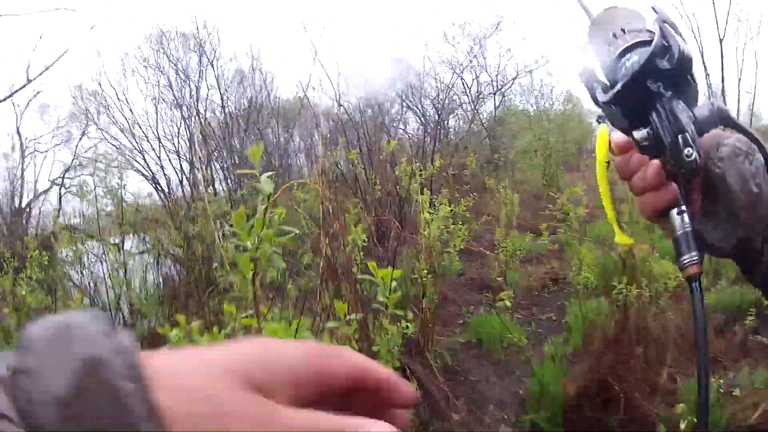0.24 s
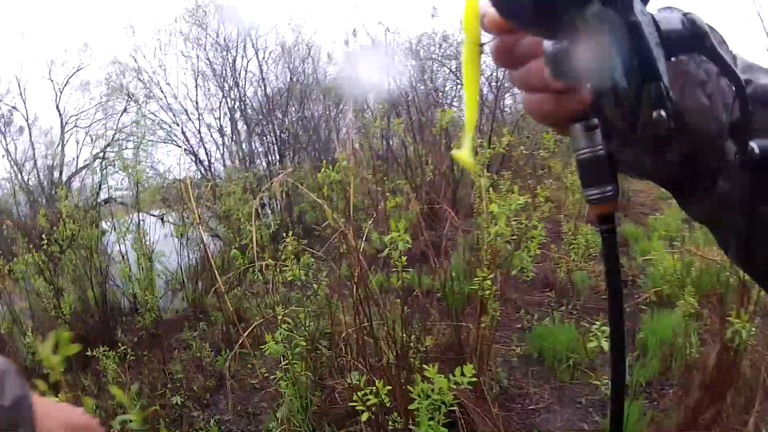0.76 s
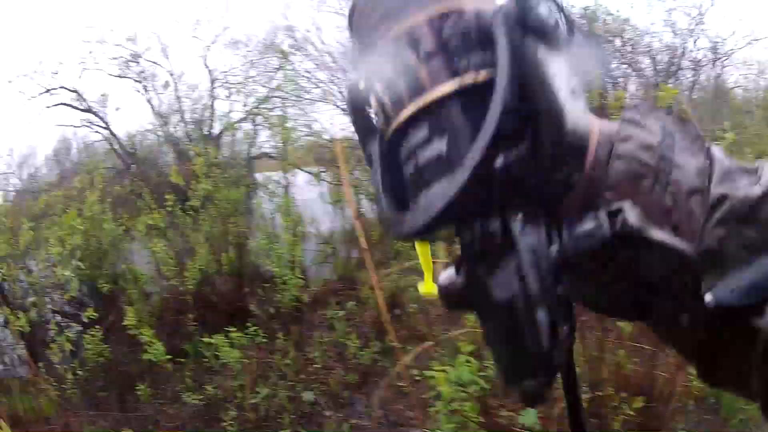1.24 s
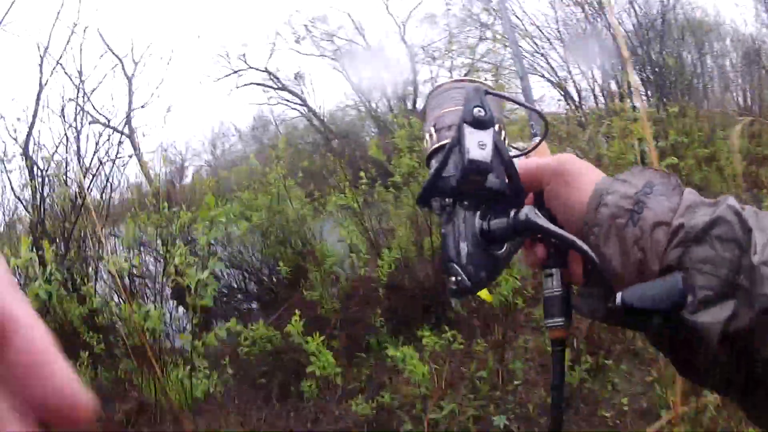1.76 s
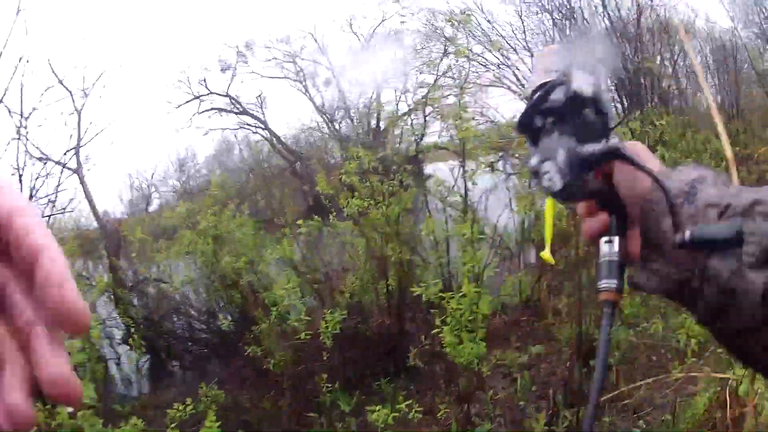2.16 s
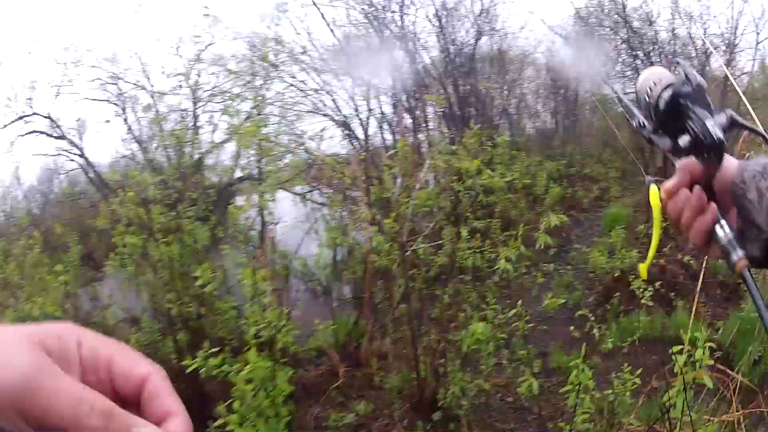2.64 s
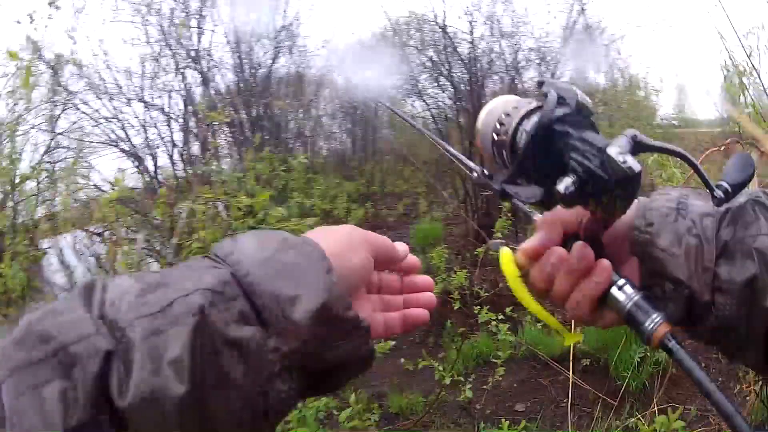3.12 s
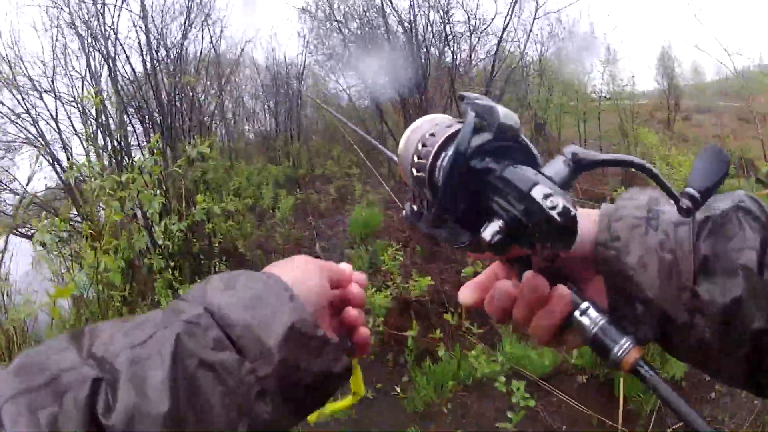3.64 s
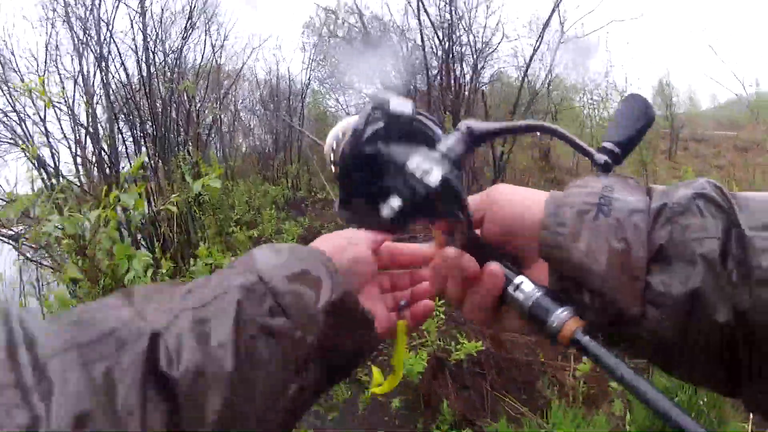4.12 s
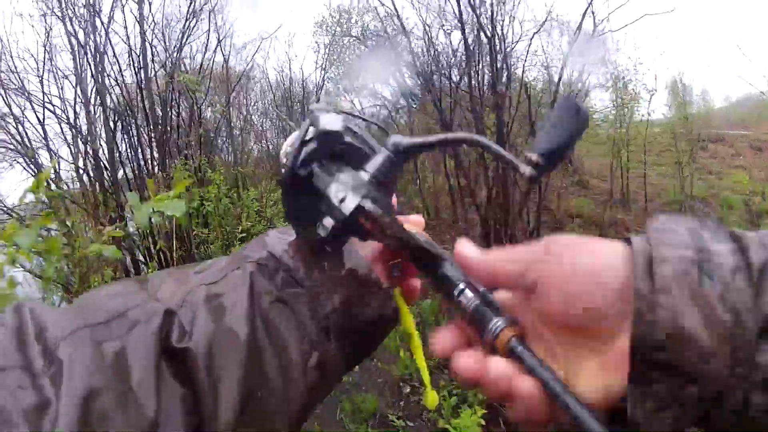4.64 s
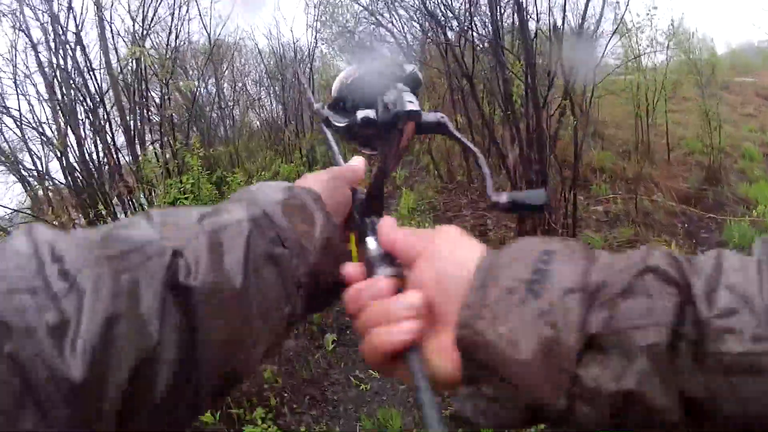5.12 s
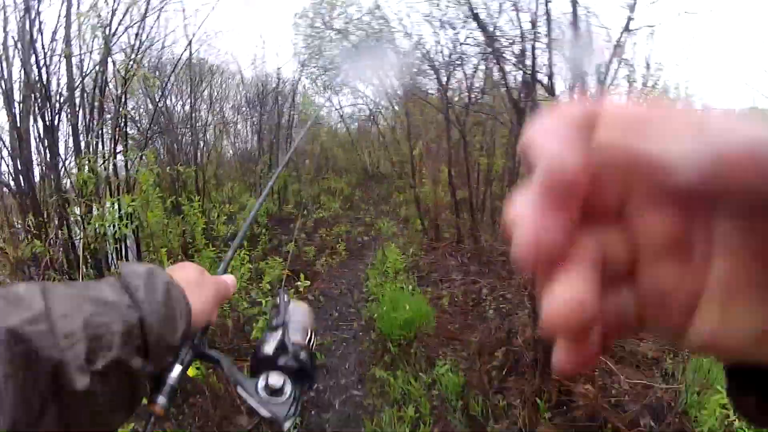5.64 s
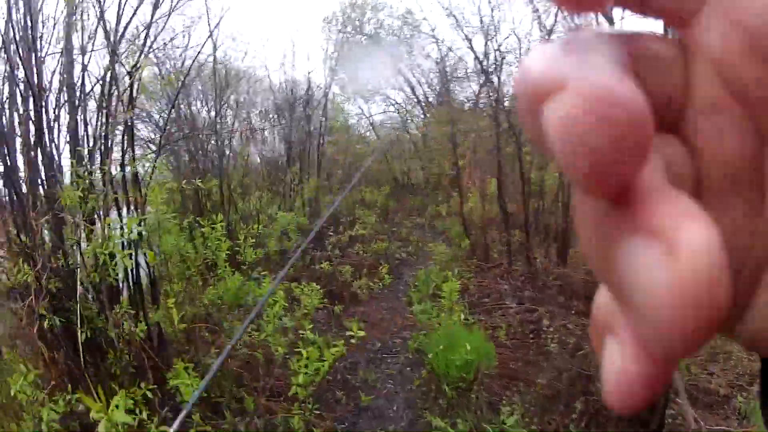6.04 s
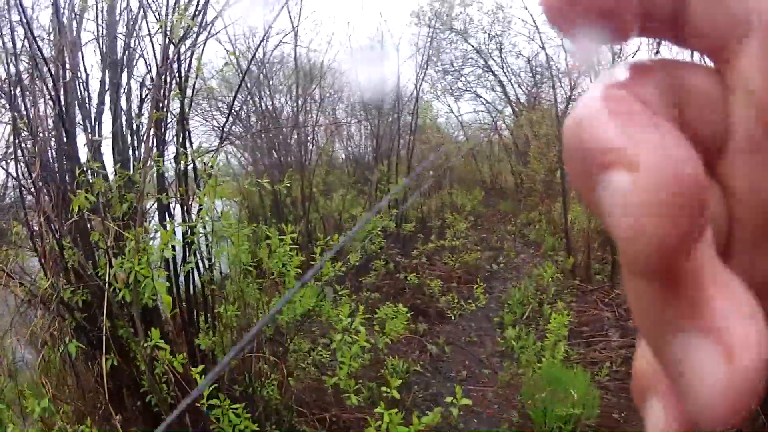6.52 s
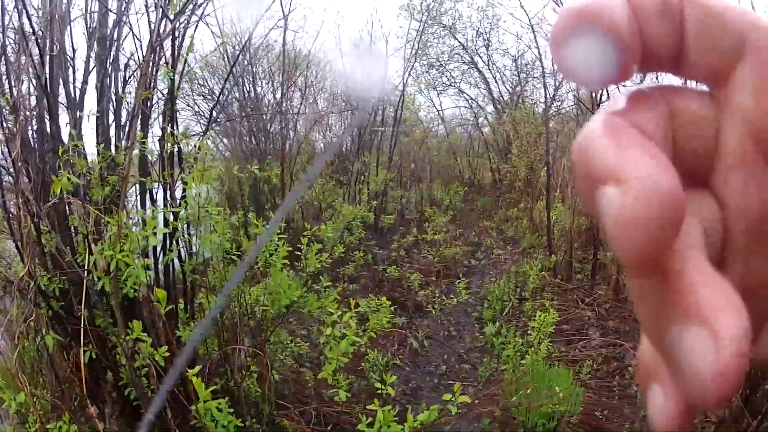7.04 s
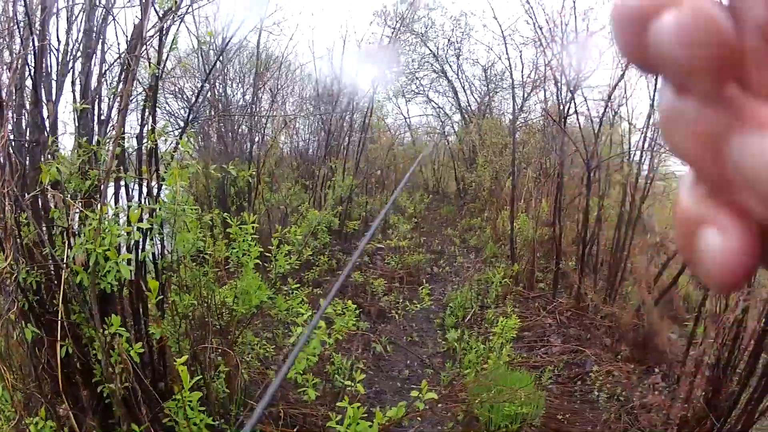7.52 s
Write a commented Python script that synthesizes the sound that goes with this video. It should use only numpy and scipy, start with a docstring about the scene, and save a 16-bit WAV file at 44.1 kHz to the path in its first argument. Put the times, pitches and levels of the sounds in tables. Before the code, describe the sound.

Close, dry handling and brushing sounds of a walk through wet undergrowth, picked up inside a small camera case. A muffled jacket rub and low boot rumble continue throughout, with grainy stem swish and faint wet leaf fizz. From 0.3 to 0.5 s a low thump and a cluster of twig clicks arrive. At about 1.0 s comes the loudest event, a hard hollow double knock with a thump and snaps. Rustle swells around 1.9 s, then settles; a sharp snap clicks at 2.9. Rubbing rises near 3.1, knocks follow at 3.7 to 3.9, and the strongest swish comes about 4.15, with bright cracks at 4.05 and 4.6. Bumps and clicks continue at 5.2 and 5.6 to 5.8 amid another rustle. Short brushes pass at 6.1 to 6.5. It fades quietest near 7.2, then small knocks and a renewed rub close at 7.6 to 7.8. Treble is gritty.

```python
"""Walk through wet undergrowth, body-worn camera

Boots rumble, a rain jacket rubs the case, stems swish and wet leaves fizz: coloured noise on shared slips.
Twigs snap as damped sines, case modes and splinter noise; stems knock and thump the case as short swings.
Leaves drag past as swells of ragged resonant noise. The camera holds slow samples: treble mirrors the sound.
"""
import sys
import numpy as np
from scipy import signal
from scipy.fft import rfft, irfft, next_fast_len
from scipy.io import wavfile
from scipy.ndimage import uniform_filter1d, map_coordinates

SR = 44100
rng = np.random.default_rng(int(sys.argv[2]) if len(sys.argv) > 2 else 0)


def log_audio(samples):
    """Write samples as a 16-bit WAV file to the path given in sys.argv[1]."""
    # one column per channel
    frames = np.atleast_2d(samples).T
    # limit to full scale, then quantise
    limited = np.clip(frames, -1, 1)
    pcm = np.round(limited * 32767).astype(np.int16)
    wavfile.write(sys.argv[1], SR, pcm)


N = 343098

# heavier stems and footfalls thump the whole camera: (time [s], peak [dB], pitch [Hz])
THUMPS = [(0.3532, -24.5, 76), (0.9682, -32, 245), (1.045, -15, 250), (1.0852, -28.5, 59),
          (1.4508, -28, 161), (3.4292, -28, 129), (3.885, -19, 96), (4.3705, -23, 223), (4.753, -22.5, 161),
          (5.0742, -28.5, 75), (5.1502, -35, 247), (5.1804, -19, 186), (5.7846, -22, 237),
          (7.618, -34, 120), (7.6942, -33, 247), (7.7124, -26, 78), (7.7262, -25, 41)]
# stems knock the case: (time [s], peak [dB], pitch [Hz])
KNOCKS = [(0.3182, -32, 511), (0.3533, -23, 314), (0.9692, -30, 304), (1.0204, -5, 540), (1.046, -11, 530),
          (1.0852, -31, 592), (1.3057, -25.5, 402), (1.4505, -22, 355), (1.5961, -30.5, 585),
          (1.6749, -29, 610), (1.7006, -22, 470), (2.125, -28.5, 590), (2.4393, -31, 455),
          (2.7672, -22.5, 483), (2.8862, -24, 320), (3.4292, -29, 603), (3.4605, -22, 340),
          (3.7349, -16, 397), (3.885, -32, 312), (3.9156, -19, 600), (3.9982, -35, 560),
          (4.1002, -27.5, 550), (4.3702, -25, 462), (4.7531, -23, 533), (5.15, -26.5, 345),
          (5.1803, -18, 377), (5.4292, -23.5, 300), (5.5228, -26, 320), (5.568, -17, 536),
          (5.6443, -25, 580), (5.7851, -26, 600), (6.411, -31, 506), (6.4524, -21, 567),
          (6.7622, -36.5, 533), (7.0002, -37.5, 303), (7.049, -31, 595), (7.2712, -31, 550),
          (7.5637, -31.5, 408), (7.6178, -28.5, 358), (7.6329, -29, 334), (7.6942, -29.5, 581),
          (7.7265, -26.5, 590)]
# air in the case: (pitch [Hz], t60 [s])
CAVITY = (633, 0.022)
# low modes of the case: (pitch [Hz], relative level [dB], t60 [s])
BODY_MODES = [(940, 4, 0.018), (1255, -1.5, 0.023), (1660, -4.5, 0.013)]
# high modes of the case: (pitch [Hz], relative level [dB], t60 [s])
CASE_MODES = [(2096, -1.5, .014), (2540, -2.5, 0.0071), (2910, -2.5, 0.015)]
# twig snaps: (time [s], crack level [dB], crack pitch [Hz], body level [dB], splinter noise drive [dB])
TWIGS = [(0.262, -30, 2900, -40.5, -27), (0.3168, -44.5, 1900, -38, -38), (0.354, -20, 2270, -28, -37),
         (0.383, -38, 1960, -43, -32), (0.421, -41, 2020, -41, -26.5), (0.4459, -32.5, 1800, -42, -30),
         (0.4612, -26, 1780, -32.5, -17), (0.566, -43, 2200, -46, -56), (1.0213, -20.5, 2070, -30, -19.5),
         (1.0465, -16, 2730, -44, -45), (1.0858, -30, 2350, -38, -40), (1.3067, -34, 1950, -33, -33),
         (1.4698, -56, 2350, -55, -31.5), (1.597, -40, 2030, -55, -28.5), (1.9903, -35.5, 2660, -44, -41),
         (2.2617, -35.5, 1930, -44, -33), (2.379, -39.5, 2030, -47, -54), (2.7951, -31.5, 3270, -50, -27),
         (2.8862, -17.5, 1590, -32, -41), (2.9872, -31, 1850, -49, -22), (3.4284, -61, 2200, -39, -49),
         (3.7348, -46, 2100, -64, -26), (3.885, -24, 2300, -37, -54), (3.8939, -19, 2230, -23, -16),
         (3.9158, -24, 2200, -34, -44), (3.9675, -43.5, 2040, -38, -38), (3.999, -33.5, 3080, -51, -43),
         (4.05, -15, 3200, -40, -7.5), (4.061, -30.5, 1920, -49, -18), (4.147, -38.5, 2230, -31, -30),
         (4.4295, -37.5, 2700, -57, -51), (4.5815, -17, 2130, -27, -9), (4.6577, -43, 2770, -56, -33),
         (4.6898, -38, 2150, -36, -31), (4.7547, -48, 2010, -42, -36), (4.7698, -47, 2630, -35, -51),
         (4.8386, -33, 2830, -56, -53), (4.879, -35, 2440, -51, -41), (4.9185, -39, 2880, -54, -36),
         (5.18, -42, 2230, -40.5, -19), (5.25, -37, 2800, -44, -46), (5.2628, -36, 2000, -49, -52),
         (5.45, -40, 2230, -46, -27.5), (5.5331, -39, 2520, -33.5, -43), (5.567, -29.5, 1990, -39, -26),
         (5.6446, -36, 3040, -36, -33), (5.7256, -20, 3030, -37, -31), (5.7847, -50, 2000, -41, -50),
         (5.96, -40.5, 1990, -47, -52), (6.1173, -31, 1740, -38, -38), (6.1318, -34.5, 1930, -42, -38),
         (6.4521, -36, 1570, -31.5, -49), (6.46, -31.5, 2900, -57, -44), (6.5854, -43, 2080, -40, -30),
         (6.761, -29.5, 2020, -59, -49), (7.002, -43, 2080, -46.5, -55), (7.0417, -46, 2220, -45.5, -56),
         (7.294, -48, 2740, -49.5, -35), (7.4465, -39.5, 2040, -50, -46), (7.5644, -37.5, 2030, -34.5, -49)]
# short ragged leaf sweeps: (time [s], length [s], level [dB], centre [Hz], width [Hz])
SWEEPS = [(0.438, 0.039, -43, 2020, 1800), (2.765, 0.033, -51, 1460, 1500),
          (6.112, 0.071, -50.5, 1860, 2200), (6.266, 0.036, -45, 2630, 1800),
          (6.299, 0.034, -47, 1490, 1610), (6.868, 0.023, -56.5, 2400, 700), (6.914, 0.015, -49, 2370, 600),
          (6.947, 0.019, -54, 2320, 900), (7.527, 0.13, -55.5, 2180, 2010)]
# level curves of the walk: (time [s], jacket rub [dB], stem swish [dB])
STRIDE = [(0.0, -48, -56.5), (0.28, -47, -54), (0.43, -41, -51.5), (0.82, -43, -53.5), (1.13, -43, -49),
          (1.5, -46, -55), (1.67, -47.5, -47.5), (1.85, -39.5, -43.5), (1.99, -38.5, -44.5),
          (2.25, -44.5, -56), (2.49, -47, -56.5), (3.14, -39, -47), (3.55, -44.5, -54.5),
          (4.15, -34.5, -39.5), (4.36, -40, -45.5), (4.46, -46.5, -55.5), (5.59, -38.5, -44.5),
          (5.95, -46, -54), (6.14, -39, -53.5), (6.2, -48.5, -53.5), (6.32, -37.5, -49.5), (6.39, -46, -56),
          (6.46, -41, -46), (6.69, -50, -58), (7.2, -56, -64), (7.78, -42.5, -50)]
# boot rumble colour: (frequency [Hz], relative density [dB])
RUMBLE_COLOUR = [(8.8, -37), (15, -22), (54, 6.5), (220, -0.5), (290, -28), (480, -120)]
# jacket rub colour: (frequency [Hz], relative density [dB])
RUB_COLOUR = [(71, -6), (120, -5), (594, -2), (748, -6), (848, -17), (1200, -17), (1560, -25), (2640, -120)]
# stem swish colour: (frequency [Hz], relative density [dB])
SWISH_COLOUR = [(470, -2), (800, -2.5), (1060, -11), (1770, -11.5), (2200, -9), (3600, -16), (4680, -22.5),
                (7920, -120)]
# wet fizz colour: (frequency [Hz], relative density [dB])
FIZZ_COLOUR = [(1760, -55), (3000, -3.5), (4220, -10), (4840, -6.5), (6000, -10), (7800, -49),
               (13200, -120)]

RUMBLE_UNDER_RUB_DB, RUMBLE_SWING_RATIO = 9, 1.0
FIZZ_UNDER_SWISH_DB, FIZZ_SWING_RATIO = 12.5, 0.54
SPLINTER_PITCH_RATIO = 1.66  # over the crack
HOLD_HZ, DULL_HZ, TOP_HZ = 12000, 15300, 16494  # sampling rate, treble step, upper cutoff


def amp(db):
    """Gain of a level in dB."""
    return 10 ** (np.asarray(db) / 20)


def unit(x):
    """x at rms 1."""
    return x / np.sqrt(np.mean(x ** 2) + 1e-20)


def along(points, hz):
    """Interpolate (Hz, value) points on a log frequency axis."""
    f, v = np.transpose(points)
    return np.interp(np.log(hz + 1), np.log(f + 1), v)


def curves(rows):
    """One per-sample curve for each column after the time."""
    times_s, *columns = np.transpose(rows)
    return [np.interp(np.arange(N) / SR, times_s, column) for column in columns]


def follows(lead_db, under_db, swing_ratio):
    """A level that lies under another and swings with it."""
    mean_db = lead_db.mean()
    return mean_db - under_db + swing_ratio * (lead_db - mean_db)


def wobble(knots_per_s):
    """Smooth random curve through normal knots."""
    knots = rng.standard_normal(int(N * knots_per_s / SR) + 4)
    return map_coordinates(knots, [np.arange(N) * knots_per_s / SR])


def filtered(x, response):
    """x times a response of frequency, zero-padded FFT."""
    m = next_fast_len(N + SR // 2)
    return irfft(rfft(x, m) * response(np.fft.rfftfreq(m, 1 / SR)), m)[..., :N]


def add_at(out, time_s, sound):
    """Add a sound into out at a time."""
    out[round(time_s * SR):][:len(sound)] += sound


def ring(t, hz, t60_s, attack_s):
    """Damped sine that starts with a pull, peak near 1."""
    decay = amp(-60 * t / t60_s)
    return -np.sin(2 * np.pi * hz * t) * decay * (1 - np.exp(-t / attack_s))


def modes(t, table):
    """Neighbouring modes swing in opposite sense, at new strengths for every blow."""
    shake_db = rng.normal(0, 3.15, len(table))
    total = np.zeros(len(t))
    for k, (hz, db, t60_s) in enumerate(table):
        total += (-1) ** k * amp(db + shake_db[k]) * ring(t, hz, t60_s, 0.00011)
    return total


def thumps():
    """A slow swing falls 60 dB within 4.8 cycles."""
    out, t = np.zeros(N + SR), np.arange(SR // 8) / SR
    for time_s, db, hz in THUMPS:
        add_at(out, time_s, amp(db) * ring(t, hz, 4.8 / hz, 0.0017))
    return out[:N]


def knocks():
    """A stem gives the case one pull and push; the air in the case rings."""
    out, t = np.zeros(N + SR), np.arange(SR // 8) / SR
    for time_s, db, hz in KNOCKS:
        window = np.sin(np.pi * np.minimum(hz * t, 1)) ** 0.22 * (hz * t < 1)
        one_swing = -np.sin(2 * np.pi * hz * t) * window
        air = amp(rng.normal(-4.5, 2.8)) * ring(t, *CAVITY, 0.0013)
        add_at(out, time_s, amp(db) * (one_swing + air))
    return out[:N]


def twigs():
    """Each twig cracks at its own pitch, shakes the case's modes and throws a burst of bright splinters."""
    out, t = np.zeros(N + SR), np.arange(SR // 32) / SR
    for time_s, crack_db, crack_hz, body_db, splinter_db in TWIGS:
        crack = ring(t, crack_hz, 0.012, 0.00027) + 0.51 * modes(t, CASE_MODES)
        body = modes(t, BODY_MODES)
        band = signal.iirpeak(SPLINTER_PITCH_RATIO * crack_hz, 2.4, SR)
        burst = amp(-60 * t / 0.014) * rng.standard_normal(len(t))
        splinters = signal.lfilter(*band, signal.lfilter(*band, burst))
        snap = amp(crack_db) * crack + amp(body_db) * body + amp(splinter_db) * splinters
        add_at(out, time_s, snap)
    return out[:N]


def sweeps():
    """A bunch of leaves drags past: a quick swell of ragged noise in one broad resonance."""
    out = np.zeros(N + SR)
    for time_s, length_s, db, centre_hz, width_hz in SWEEPS:
        swell = np.sin(np.pi * np.linspace(0, 1, round(length_s * SR))) ** 0.18
        steps = np.repeat(rng.standard_normal(SR // 100), 128)[:SR // 6]  # new strength every 128 samples
        ragged = amp(5.0 * steps) * rng.standard_normal(SR // 6)
        band = signal.iirpeak(centre_hz, centre_hz / width_hz, SR)
        noise = signal.lfilter(*band, signal.lfilter(*band, ragged))
        add_at(out, time_s, amp(db) * swell * unit(noise)[:len(swell)])
    return out[:N]


def crackle(per_s, spread_db, t60_s, busy):
    """Envelope of sudden small slips that die away, denser when busy, a few much larger."""
    chance, size = rng.random(N), rng.exponential(size=N)
    slips = (chance < busy * per_s / SR) * amp(spread_db * np.minimum(size, 3))
    return unit(signal.lfilter([1], [1, -amp(-60 / (t60_s * SR))], slips))


def grains(per_s, centre_hz, octaves, cycles, spread_db, busy):
    """Tiny ticks, each a few cycles at its own pitch, denser when busy, a few much larger."""
    starts = np.flatnonzero(rng.random(N) < busy * per_s / SR)
    draw, t = rng.standard_normal((len(starts), 2)), np.arange(400) / SR
    hz = np.clip(centre_hz * 2 ** (octaves * draw[:, :1]), 60, 5600)
    size = amp(spread_db * np.minimum(np.abs(draw[:, 1:]), 2.5))
    ticks = size * ring(t, hz, cycles / hz, 0.28 / hz)
    places = starts[:, None] + np.arange(400)
    return unit(np.bincount(places.ravel(), ticks.ravel(), N + 400)[:N])


def patchy(patchy_db):
    """White noise whose colour drifts in patches a few hundred Hz high and some 60 ms long."""
    z = signal.stft(rng.standard_normal(N), nperseg=512)[2]
    field = uniform_filter1d(rng.standard_normal(z.shape), size=5, axis=0)  # over frequency
    field = uniform_filter1d(field, size=10, axis=1)  # over time
    return signal.istft(z * amp(patchy_db * unit(field)), nperseg=512)[1][:N]


def friction(colour, level_db, slips, grain_db, lumps_db, lumps_per_s, ticks=0):
    """Noise whose strength lumps slowly and jumps with every slip, ticks on top, in the source's colour."""
    effort = amp(lumps_db * wobble(lumps_per_s)) * (1 + amp(grain_db) * slips)
    rough = unit(effort * patchy(2.43)) + ticks
    return amp(level_db) * unit(filtered(rough, lambda hz: amp(along(colour, hz))))


def stride():
    """Rubbing cloth and bending stems share their slips, so bass and treble crackle together."""
    rub_db, swish_db = curves(STRIDE)
    rumble_db = follows(rub_db, RUMBLE_UNDER_RUB_DB, RUMBLE_SWING_RATIO)
    fizz_db = follows(swish_db, FIZZ_UNDER_SWISH_DB, FIZZ_SWING_RATIO)

    busy = unit(amp(2.5 * wobble(14)))  # slips come in clumps
    calm = unit(amp(-0.3 * swish_db))  # a strong stroke smooths into a swish that covers single ticks
    coarse = crackle(per_s=83, spread_db=5.5, t60_s=0.021, busy=busy)
    fine = calm * crackle(per_s=120, spread_db=3.0, t60_s=0.021, busy=busy)

    folds = amp(-17.5) * grains(
        per_s=70, centre_hz=455, octaves=0.71, cycles=3.9, spread_db=6.0, busy=busy)
    leaves = amp(-11.0) * calm * grains(
        per_s=170, centre_hz=2126, octaves=0.572, cycles=16, spread_db=8.5, busy=busy)
    beads = amp(-14.5) * calm * grains(
        per_s=130, centre_hz=4320, octaves=0.27, cycles=34, spread_db=11.0, busy=busy)

    boots = friction(RUMBLE_COLOUR, rumble_db, coarse, grain_db=-3.5, lumps_db=0.5, lumps_per_s=12)
    jacket = friction(RUB_COLOUR, rub_db, coarse + 0.5 * fine,
                      grain_db=-7.5, lumps_db=2.0, lumps_per_s=25, ticks=folds)
    stems = friction(SWISH_COLOUR, swish_db, fine + 0.19 * coarse,
                     grain_db=-8.5, lumps_db=0.5, lumps_per_s=27, ticks=leaves)
    drops = friction(FIZZ_COLOUR, fizz_db, fine,
                     grain_db=-5.0, lumps_db=2.5, lumps_per_s=16, ticks=beads)
    return boots + jacket + stems + drops


def scene():
    """Sum of all sources at the one microphone in the case."""
    return (thumps() + knocks() + twigs() + sweeps() + stride())[None]


def record(dry):
    """Slow sampling copies the spectrum around its rate; a four-step hold weakens the copies."""
    slow = filtered(dry, lambda hz: 1 / (1 + (hz / 5750) ** 34) * (hz < HOLD_HZ / 2))
    sampled = slow * (1 + 2 * np.cos(2 * np.pi * HOLD_HZ * np.arange(N) / SR))
    held = filtered(sampled, lambda hz: np.sinc(hz / HOLD_HZ) / np.sinc(hz / (4 * HOLD_HZ)))
    dulled = filtered(held, lambda hz: np.where(hz < DULL_HZ, 1, amp(-24)))
    return filtered(dulled, lambda hz: hz < TOP_HZ)


dry = scene()
out = record(dry)
log_audio(out)
```